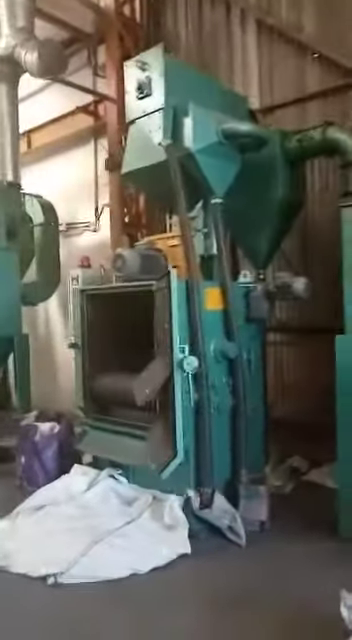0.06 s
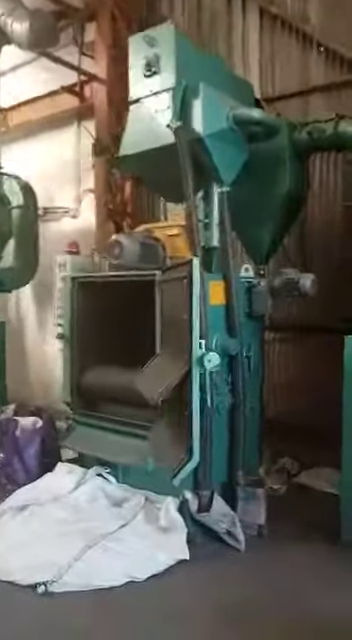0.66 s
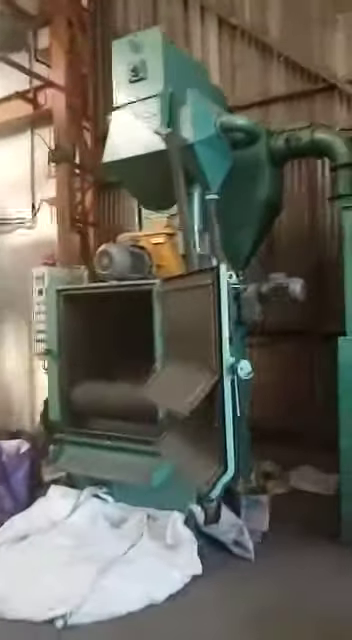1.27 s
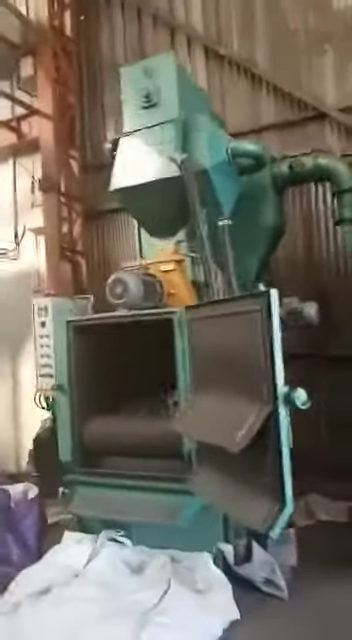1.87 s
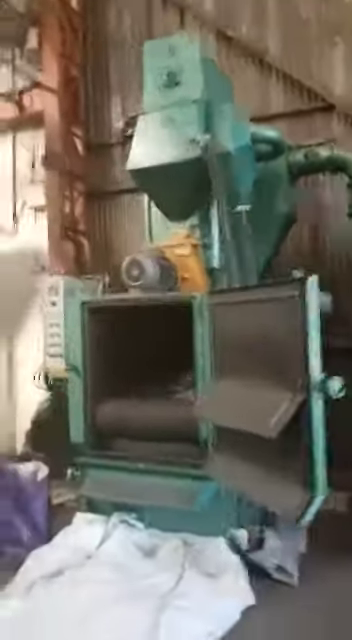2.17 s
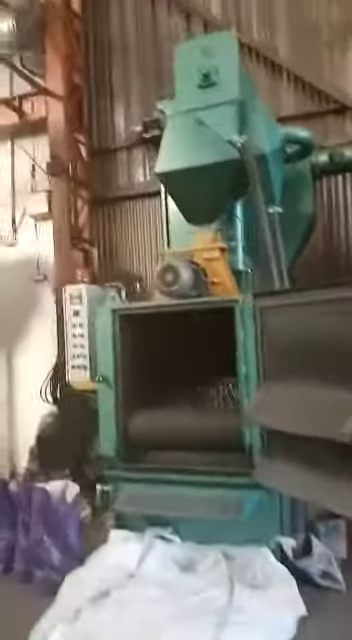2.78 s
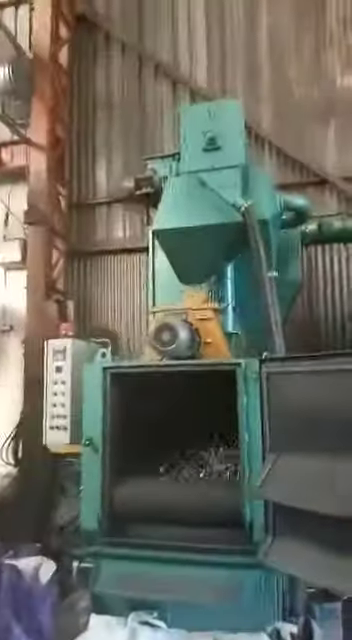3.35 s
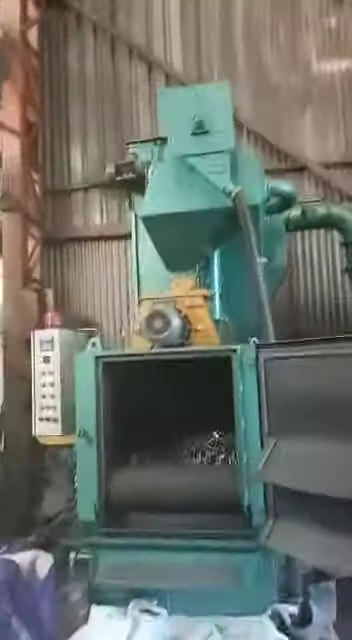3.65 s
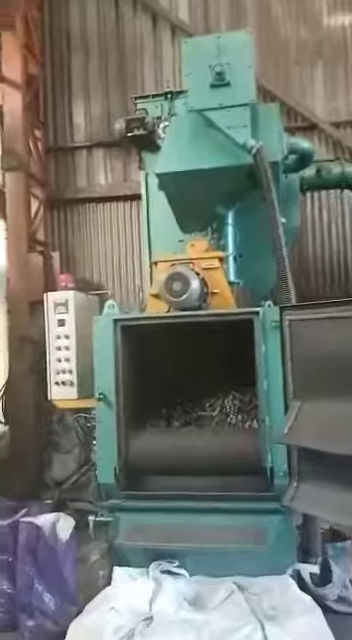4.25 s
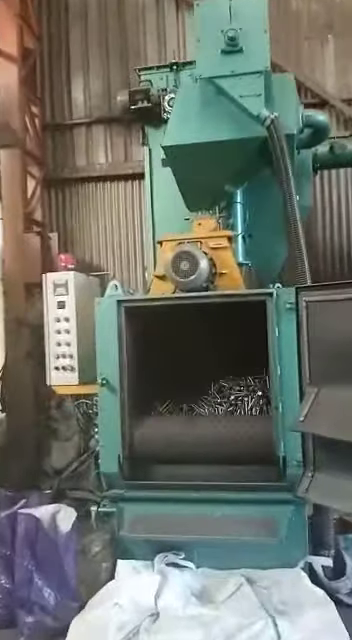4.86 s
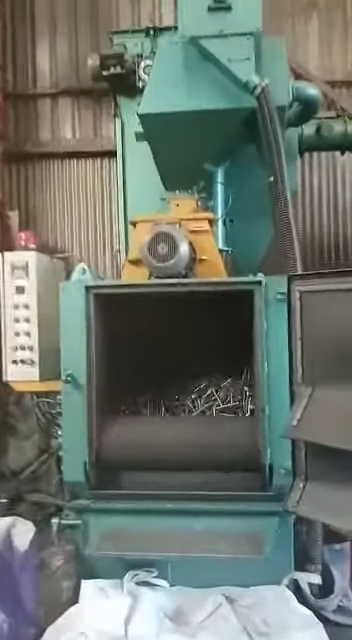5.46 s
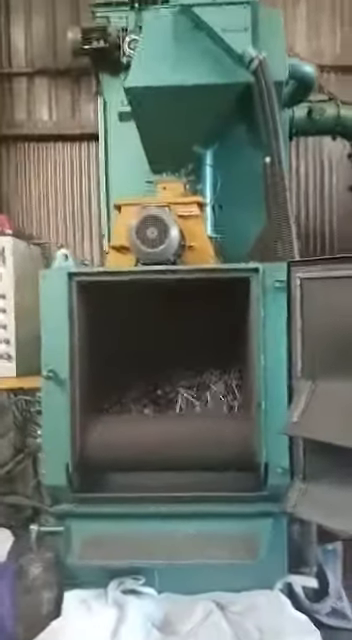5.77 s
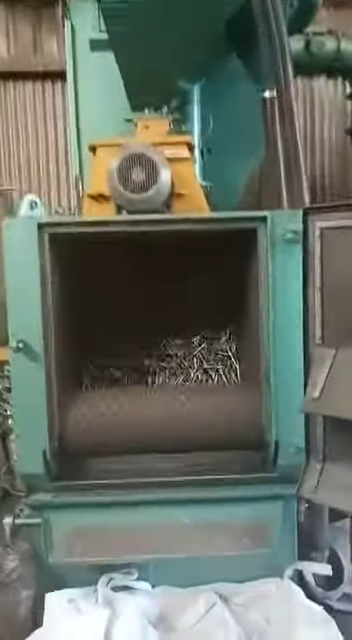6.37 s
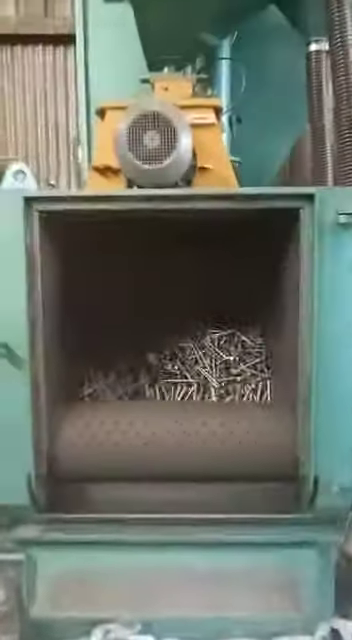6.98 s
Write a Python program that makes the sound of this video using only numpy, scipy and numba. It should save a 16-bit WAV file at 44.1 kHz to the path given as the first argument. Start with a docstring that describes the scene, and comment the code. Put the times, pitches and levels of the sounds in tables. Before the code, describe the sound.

A heap of steel pins tumbles on the rubber belt of an open blasting machine in a workshop. They clatter and jingle without pause, with single bright clinks standing out, over the steady low rumble of the drive and fan. Irregular knocks, brief scrapes and dull thumps come from the steel cabinet as the load slides. The sound grows a little louder as the microphone moves nearer.

```python
"""Steel pins tumble on the rubber belt of a blasting machine, its door open, in a sheet-metal workshop.
Each impact gives a broadband click and excites three bending modes, which the heap damps in buried pins.
Slides of the heap drive the panel modes of the steel cabinet and the air modes of the drum.
Belt drive and fan rumble underneath, while the listener moves slowly towards the opening."""
import sys
import numpy as np
from scipy import signal
from scipy.fft import rfft, irfft, next_fast_len
from scipy.io import wavfile
from scipy.ndimage import uniform_filter1d
from numba import njit

SR = 44100
rng = np.random.default_rng(int(sys.argv[2]) if len(sys.argv) > 2 else 0)


def to_wav(s):
    """Save 16-bit WAV."""
    ch = np.atleast_2d(s).T  # columns
    pcm = np.round(np.clip(ch, -1, 1) * 32767)  # PCM
    wavfile.write(sys.argv[1], SR, pcm.astype(np.int16))


N = 314433
TIME = np.arange(N) / SR
FFT_SIZE = 2 * next_fast_len(N // 2 + 8192)
FREQ = np.fft.rfftfreq(FFT_SIZE, 1 / SR)
SIDES = np.array([[1], [-1]])  # left, right; pan_db is left minus right
HALL_T60_S, PANEL_T60_S = 0.3, 0.15
BUILD_S = 0.0035  # a ring builds up among the reflections of the drum


def pins(clatter):
    """Impact excitation: a stream of collisions makes the pins click, rasp and ring."""
    start_s, size = blows(per_s=900, scatter_db=4.0)
    contacts = unit(bursts(start_s, size, t60=0.067, hall_db=-7.0))
    noise = clicks(contacts, clatter) + wedged_pins(contacts, clatter)
    return noise + buried_pins(start_s, size, clatter) + loose_pins()


# bending modes of a pin: pitch_hz, t60_s, spread_hz, gain_db, pan_db
PIN_MODES = [(2928, 0.27, 8.75, -0.5, -4.5), (7777, 0.16, 29.5, 4, 7), (14480, 0.082, 50.7, 2.5, -0.5)]
def bending(start_s, size, mode, damping_spread, phase_spread, tuning=1):
    """Flexural vibration of bars: length sets each pin's pitch, contact with its neighbours its decay."""
    hz, t60, spread_hz, db, pan_db = mode
    length, damping, place, spot = rng.standard_normal((len(start_s), 4)).T
    pitch_hz = hz * tuning + spread_hz * length
    ring_t60 = t60 * np.exp(damping_spread * np.clip(damping, -2, 1))
    swing = size * np.sign(spot)  # the side struck sets the sign of the first swing
    return rings(start_s, pitch_hz, ring_t60, swing, phase_spread * place) * undb(db + SIDES * pan_db / 2)


# envelope of the loose pins' first mode: time_s, level_db
FIRST_MODE_LEVELS = [(0.0, -38), (0.2, -28.5), (0.75, -35.5), (1.1, -28.5), (1.41, -26.5), (1.71, -28.5),
                     (2.41, -31.5), (2.91, -30.5), (3.1, -28.5), (4.12, -26.5), (4.8, -23.5), (4.92, -32.5),
                     (5.6, -33), (5.78, -28), (6.2, -29), (6.5, -37), (6.73, -40), (6.83, -28.5),
                     (7.13, -38)]
# envelopes of their overtones: time_s, second_mode_db, third_mode_db
OVERTONE_LEVELS = [(0.0, -30, -29.5), (0.8, -34, -33.5), (0.9, -29.5, -29), (1.51, -28, -26.5),
                   (1.91, -40, -32), (2.41, -30, -30.5), (2.81, -33, -30), (3.31, -32, -24),
                   (4.02, -34, -28.5), (4.72, -28.5, -23), (5.22, -34, -25), (5.72, -26, -23.5),
                   (6.53, -28.5, -25.5), (7.13, -24.5, -20)]
# offset added to each mode's envelope: gain_db
LOOSE_TRIM_DB = [-0.7, 0.13, -1.3]
def loose_pins():
    """Beating: lightly damped pins on top of the heap ring on together at slightly different pitches."""
    hits = blows(per_s=300, scatter_db=3.0)
    levels = curves(FIRST_MODE_LEVELS) + curves(OVERTONE_LEVELS)
    out = 0
    for mode, level_db, trim_db, phase in zip(PIN_MODES, levels, LOOSE_TRIM_DB, (1.1, 2.2, 2.2)):
        ring = bending(*hits, mode, damping_spread=0.37, phase_spread=phase)
        out += steady(hall(ring, wet_db=-5)) * undb(level_db + trim_db)
    return out


# ring of buried pins relative to the clatter, one per mode: gain_db
BURIED_GAIN_DB = [1.5, -8, -15]
def buried_pins(start_s, size, clatter):
    """Contact damping: the surrounding heap cuts the ring of a buried pin short."""
    out = 0
    for (hz, t60, *rest), gain_db, phase in zip(PIN_MODES, BURIED_GAIN_DB, (1.837, 3.674, 3.674)):
        ring = bending(start_s, size, (hz, 0.13 * t60, *rest), damping_spread=0.21, phase_spread=phase)
        out += unit(ring) * clatter * undb(gain_db)
    return out


# pins that fall clear: start_s, pitch_hz, first_mode_db, second_mode_db, third_mode_db
FALLING_PINS = [(0.12, 2906, -24, -42, -36), (0.49, 2919, -27, -36, -38), (0.95, 2924, -34, -44, -20),
                (1.069, 2923, -20, -42, -37), (1.32, 2926, -21.5, -40, -40), (1.408, 2923, -19, -38, -34),
                (1.526, 2931, -22.5, -49, -44), (2.11, 2924, -20.5, -46, -38),
                (2.506, 2935, -15.5, -40, -35), (2.935, 2920, -43, -26, -32),
                (3.009, 2924, -19.5, -42, -26), (3.054, 2927, -20.5, -41, -34),
                (3.605, 2923, -23, -46, -44), (4.34, 2912, -20.5, -43, -36), (4.41, 2925, -22.5, -40, -34),
                (4.63, 2929, -29, -28, -20), (4.795, 2930, -19, -41, -32), (4.846, 2920, -28, -44, -36),
                (5.098, 2921, -21, -35, -38), (5.201, 2920, -21, -42, -36), (5.275, 2925, -23, -43, -36),
                (5.497, 2936, -21, -32, -32), (6.155, 2920, -22.5, -29, -35),
                (6.245, 2937, -20.5, -24, -35), (6.375, 2926, -20.5, -40, -29),
                (6.525, 2938, -19.5, -40, -33), (6.614, 2934, -18, -30, -31), (6.728, 2920, -46, -23, -24),
                (6.805, 2921, -19, -26, -18), (6.918, 2912, -24, -28, -34), (6.985, 2935, -25, -37, -30)]
def falling_pins():
    """Free vibration: single pins land clear of the heap and ring longer, each at its own pitch."""
    start_s, pitch_hz, *mode_dbs = np.transpose(FALLING_PINS)
    tuning = pitch_hz / PIN_MODES[0][0]
    ring = 0
    for (hz, t60, _, db, pan_db), fall_db, phase in zip(PIN_MODES, mode_dbs, (.3, .9, .9)):
        mode = (hz, 1.33 * t60, 0, db, pan_db)
        ring += bending(start_s, undb(fall_db), mode, 0.071, phase, tuning)
    return hall(ring, wet_db=-8.5)


# spectrum of steel striking steel: frequency_hz, left_db, right_db
CLICK_SPECTRUM = [(396, 8.5, 6), (1430, 12, 12.5), (3560, 9, 11), (4430, 9, 13.5), (5400, 4.5, 10.5),
                  (6600, 3, 12.5), (7260, 3.5, 4), (8170, 20.5, 12), (9470, 14, 3), (10260, 9.5, 5.5),
                  (11270, -12, 4.5), (13200, -28, -28), (15700, 8, 5.5)]
def clicks(contacts, clatter):
    """Brief contact gives a broad spectrum; pins on top of the heap click most sharply."""
    sharp = unit(bursts(*blows(per_s=70, scatter_db=1.5), t60=0.0074, hall_db=-11.5))
    steel = unit(colour(contacts + undb(-11.5) * sharp, undb(spectrum(CLICK_SPECTRUM))))
    hardness_db = curves(OVERTONE_LEVELS)[0]  # hard contacts feed the overtones and also click louder
    return steel * clatter ** .68 * undb(0.33 * hardness_db + 6.0)


# modes of wedged pins: centre_hz, width_hz, gain_db, pan_db
WEDGED_MODES = [(2936, 296, -40.5, -2.5), (7820, 170, -46, -1), (14600, 610, -39, -9)]
def wedged_pins(contacts, clatter):
    """Damping broadens a resonance: pins wedged tight give their modes as a rasp."""
    envelope = unit(clatter ** .5)
    return sum(unit(colour(contacts, resonances([(hz, width, 0, pan_db)]))) * envelope * undb(db)
               for hz, width, db, pan_db in WEDGED_MODES)


# glancing blows in the doorway: start_s, level_db
GLANCING_BLOWS = [(0.484, -30), (2.06, -32), (2.602, -30), (3.945, -28), (4.367, -28), (6.508, -23.5),
                  (6.94, -22)]
def ticks():
    """Direct sound dominates near the opening: glancing pins tick brightly, with little reverberation."""
    start_s, db = np.transpose(GLANCING_BLOWS)
    return colour(bursts(start_s, undb(db), t60=0.11, hall_db=-16), unit(undb(spectrum(CLICK_SPECTRUM))))


# slides of the heap: middle_s, length_s, clatter_db, drumming_db, boom_db
HEAP_SLIDES = [(0.165, 0.13, -37, -36, -55), (0.298, 0.07, -38, -31, -55), (1.29, 0.82, -37.5, -37.5, -59),
               (1.81, 0.73, -39, -33, -47), (2.356, 0.38, -38.5, -34, -42), (3.017, 0.79, -39.5, -37, -38),
               (3.498, 0.78, -36.5, -28, -40.5), (4.247, 0.73, -41.5, -39, -56),
               (4.797, 0.44, -61, -51, -38), (5.055, 0.12, -37, -39, -40), (5.36, 0.75, -36, -27, -40),
               (6.364, 0.66, -39.5, -31.5, -46), (6.692, 0.2, -39.5, -28.5, -47),
               (7.12, 0.47, -36.5, -28, -55)]
def heap_envelopes():
    """Avalanching: the belt lifts the heap until part of it slides, in swells above a steady trickle."""
    middle_s, length_s, clatter_db, drumming_db, boom_db = np.transpose(HEAP_SLIDES)
    unrest = wander(per_s=18)
    clatter = surges(middle_s, length_s, clatter_db, rest_db=-40.5) * undb(0.5 * unrest - 0.03)
    drumming = surges(middle_s, length_s, drumming_db, rest_db=-34) * undb(0.78 * unrest)
    boom = surges(middle_s - 0.23, length_s, boom_db, rest_db=-39.5)  # the heap shifts before it slides
    return clatter * approach(db_per_halving=1.5), drumming * approach(db_per_halving=-0.57), boom


# panel modes of the cabinet: centre_hz, width_hz, gain_db, pan_db
PANEL_MODES = [(631, 57, -6.5, 4.5), (704, 140, -13.5, 0), (902, 44, 0, -1.5), (962, 83, -0.5, -4.5),
               (1110, 53, 2.5, -0.5), (1184, 116, -4.5, -6), (1397, 63, 0, 0.5), (1629, 46, -5, -5.5),
               (1750, 61, -2.5, -6), (1816, 51, -1.5, -4.5), (1946, 86, -6, 0), (2150, 115, -4.5, -3.5)]
def cabinet(drumming):
    """Plate resonance: the steel panels filter the patter of the sliding heap."""
    patter = unit(bursts(*blows(per_s=170, scatter_db=3.0), t60=0.013, hall_db=-5.5)) * drumming
    return colour(patter, unit(resonances(PANEL_MODES)))


# pins that hit the wall: start_s, blow_db, crack_relative_db, ring_hz, ring_db
WALL_KNOCKS = [(0.064, -30, -17, 1760, -31), (0.285, -22.5, -23, 1120, -34),
               (0.406, -26.5, -9.5, 1393, -36), (0.955, -26, -24, 1813, -28), (1.278, -26, -20, 1406, -27),
               (1.335, -22.5, -18, 1150, -26), (1.576, -21.5, -14, 1730, -32), (1.738, -25, -9, 1415, -34),
               (2.041, -22, -20, 1123, -28), (3.235, -29, -8, 967, -23.5), (3.952, -26.5, -16, 1790, -35),
               (4.06, -27, -21, 1380, -35), (4.214, -31, -6, 1114, -25.5), (4.378, -25, -12, 1394, -31),
               (4.806, -24, -12, 1790, -31), (4.993, -17, -22, 923, -27), (5.531, -23, -12, 1830, -32),
               (5.761, -26.5, -12, 932, -28), (6.252, -26, -7, 1786, -28), (6.355, -22.5, -14, 1112, -22.5),
               (6.668, -31, -7, 900, -30)]
def knocks():
    """A hard hammer favours high modes: a bare pin cracks on a panel, and one mode rings on."""
    start_s, blow_db, crack_db, ring_hz, ring_db = np.transpose(WALL_KNOCKS)
    blow = bursts(start_s, undb(blow_db + 2.0), t60=0.075, hall_db=-24)
    hardness = undb(spectrum([(900, -5.5), (1900, -0.5), (3000, 10)]))
    knock = colour(blow, hardness * unit(resonances(PANEL_MODES)))
    crack = bursts(start_s, undb(blow_db + crack_db), t60=0.21, hall_db=-14)
    brightness = undb(spectrum(CLICK_SPECTRUM) + spectrum([(2500, 1), (9000, -0.5)]))
    phase = 0.82 * rng.standard_normal(len(start_s))
    clinks = rings(start_s, ring_hz, np.full(len(start_s), PANEL_T60_S), undb(ring_db), phase)
    return knock + colour(crack, brightness) + hall(clinks, wet_db=-7)


# the load judders along the wall: middle_s, length_s, pitch_hz, level_db
WALL_SCRAPES = [(1.21, 0.4, 280, -42), (2.315, 0.125, 1134, -32.5), (3.53, 0.42, 1103, -40),
                (4.8, 0.18, 298, -38), (5.29, 0.25, 955, -37), (5.48, 0.4, 1110, -39.5),
                (6.62, 0.2, 1070, -39), (6.65, 0.57, 633, -46.5), (6.73, 0.36, 915, -42.5)]
def scrapes(slips=32):
    """Stick-slip friction: every slip kicks one panel mode afresh, so the tone comes out rough."""
    middle_s, length_s, hz, db = np.repeat(WALL_SCRAPES, slips, axis=0).T
    late, force, detune, place = rng.standard_normal((len(hz), 4)).T
    along = (np.arange(len(hz)) % slips + .5 * late) / slips - .5
    start_s = middle_s + along * length_s
    size = undb(db + 2.0) * np.sign(force) * np.sqrt(length_s / PANEL_T60_S)
    ring = rings(start_s, hz * (1 + .004 * detune), np.full(len(hz), PANEL_T60_S), size, .5 * place)
    return hall(ring, wet_db=-9.5)


# air modes of the drum: centre_hz, width_hz, gain_db, pan_db
AIR_MODES = [(275.4, 45, 0.5, -0.5), (297.4, 19, -0.5, 1), (354, 40, -2, -2.5), (470, 100, -5.5, 0.5)]
# heavy lumps landing on the belt: start_s, level_db
BELT_THUDS = [(0.241, -34), (1.05, -33), (1.31, -31.5), (2.76, -33), (2.868, -32.5), (2.979, -33),
              (3.19, -29.5), (4.131, -34), (5.18, -29), (5.671, -33), (6.24, -33), (6.68, -31)]
def drum(boom):
    """Cavity resonance: the load thuds on the rubber and excites the air in the drum."""
    patter = unit(bursts(*blows(per_s=120, scatter_db=2.0), t60=0.014, hall_db=-6.0)) * boom
    start_s, db = np.transpose(BELT_THUDS)
    thuds = bursts(start_s, undb(db), t60=0.23, hall_db=-11)
    return colour(patter + thuds, unit(resonances(AIR_MODES)))


# the load slumps on the belt: time_s, length_s, thump_db, rumble_db
BELT_SLUMPS = [(1.793, 0.5, -32, -38.5), (2.35, 0.25, -42, -41), (2.905, .15, -37, -53),
               (3.35, 0.34, -44, -42), (3.93, .2, -40, -48), (4.59, 0.34, -32, -43),
               (5.282, 0.33, -50, -42), (5.687, 0.4, -43, -42.5), (6.356, 0.18, -40, -41),
               (6.82, 0.5, -34, -43), (7.03, .2, -38, -45)]
def slumps():
    """Damped oscillation: the whole heap drops on the slack belt with a dull thump."""
    start_s, _, db, _ = np.transpose(BELT_SLUMPS)
    each = np.ones(len(start_s))
    return rings(start_s, hz=74 * each, t60=0.33 * each, size=undb(db), phase=0 * each, build_s=0.022)


# rumble spectrum of belt and fan: frequency_hz, gain_db
RUMBLE_SPECTRUM = [(20, -28), (50, -31), (70, -28), (85, -9), (110, -3.5), (140, -0.5), (175, 1.5),
                   (215, 0.5), (300, -12), (700, -26.5)]
# motor and fan tones: pitch_hz, level_db
HUM_TONES = [(139, -52), (392, -48)]
def drive():
    """Rotating machinery gives tones over broadband noise; the noise swells as the belt takes a slump."""
    middle_s, length_s, _, rumble_db = np.transpose(BELT_SLUMPS)
    effort = surges(middle_s, length_s, rumble_db, rest_db=-42) * approach(db_per_halving=3.5)
    rumble = unit(colour(diffuse(), undb(spectrum(RUMBLE_SPECTRUM)))) * effort * undb(SIDES * 0.38)
    return rumble + sum(tone(hz, waver_hz=2.77, flutter_db=5.5) * undb(db) for hz, db in HUM_TONES)


# the belt labours: middle_s, length_s, pitch_hz, level_db
DRIVE_DRONES = [(5.26, .12, 175, -34.5), (5.428, 0.19, 166, -37.5), (5.97, 0.1, 170.7, -39),
                (6.642, .16, 174.6, -36), (7.04, 0.24, 190, -37.5)]
def drones():
    """Forced vibration: a low, unsteady hum swells from the drive under load."""
    return sum(tone(hz, waver_hz=5.0, flutter_db=6.5) * swell(middle_s, length_s) * undb(db)
               for middle_s, length_s, hz, db in DRIVE_DRONES)


# likeness of left and right in the workshop: frequency_hz, correlation
FIELD_CORRELATION = [(50, 0.41), (130, 0.95), (290, 0.93), (640, 0.44), (950, 0.49), (1150, -0.063),
                     (1400, -0.32), (1850, 0.29), (2930, 0.25), (15000, -0.24)]
def diffuse():
    """Diffuse field: white noise at two points, with a correlation that depends on frequency."""
    alike = np.clip(spectrum(FIELD_CORRELATION), -1, 1)
    mid, side = colour(rng.standard_normal((2, N)), np.sqrt((1 + SIDES * alike) / 2))
    return mid + SIDES * side


def hall(x, wet_db):
    """Reverberation: convolution with decaying noise adds the workshop's reflections."""
    decay = fade(HALL_T60_S)
    tail = diffuse()[:, :len(decay)] * decay
    tail /= np.sqrt(np.sum(tail ** 2) / 2)
    return x + undb(wet_db) * signal.fftconvolve(x, tail, axes=1)[:, :N]


def approach(db_per_halving):
    """Distance law: a layer's gain as the listener walks from 4.7 m to 1.9 m."""
    distance_m = np.interp(TIME, [1.0, TIME[-1]], [4.7, 1.9])
    return undb(db_per_halving * np.log2(distance_m[0] / distance_m))


def blows(per_s, scatter_db):
    """Random collisions, as times and sizes: exponentially distributed levels, many soft, a few hard."""
    count = int(per_s * TIME[-1])
    jitter, chance = rng.random((count, 2)).T
    start_s = (np.arange(count) + 4 * jitter) / per_s % TIME[-1]
    return start_s, undb(scatter_db * np.minimum(-np.log(chance), 4))


def bursts(start_s, size, t60, hall_db):
    """Incoherent sources add in power: each blow is a noise burst with a weak reverberant tail."""
    energy = np.bincount((np.clip(start_s, 0, TIME[-1]) * SR).astype(int), size ** 2, N)
    direct = signal.fftconvolve(energy, fade(t60) ** 2)[:N]
    tail = undb(hall_db) ** 2 * signal.fftconvolve(energy, fade(HALL_T60_S) ** 2)[:N]
    return np.sqrt(np.abs(direct + tail)) * diffuse()


@njit
def rings(start_s, hz, t60, size, phase, build_s=BUILD_S):
    """Damped oscillators: a decaying sine for each blow, the left side leading by a phase in radians."""
    out = np.zeros((2, N))
    for k in range(len(start_s)):
        start = max(int(start_s[k] * SR), 0)
        pole = np.exp((2j * np.pi * hz[k] - 6.91 / t60[k]) / SR)
        phasor, lead = size[k] + 0j, np.exp(1j * phase[k])
        for i in range(start, min(N, start + int(.8 * t60[k] * SR))):
            phasor *= pole
            rise = min((i - start) / (build_s * SR), 1.)
            out[0, i] += rise * (phasor * lead).imag
            out[1, i] += rise * phasor.imag
    return out


def resonances(modes):
    """Left and right gain of overlapping resonances, summed in power."""
    return np.sqrt(sum(undb(db + SIDES * pan_db / 2) ** 2 / (1 + 2 * ((FREQ - hz) / width) ** 2) ** 2
                       for hz, width, db, pan_db in modes))


def tone(hz, waver_hz, flutter_db):
    """A sine under random frequency and amplitude modulation."""
    phase = 2 * np.pi * np.cumsum(hz + waver_hz * wander(40)) / SR
    return unit(np.sin(phase) * undb(flutter_db * wander(30)))


def surges(middle_s, length_s, db, rest_db):
    """Swells on a resting level, summed in power."""
    power = sum((undb(level) * swell(at, span)) ** 2 for at, span, level in zip(middle_s, length_s, db))
    return np.sqrt(undb(rest_db) ** 2 + power)


def swell(middle_s, length_s):
    """A Gaussian rise and fall."""
    return np.exp(-(2 * (TIME - middle_s) / length_s) ** 2)


def fade(t60):
    """Exponential decay by 60 dB in t60 seconds."""
    return np.exp(-np.log(1000) * TIME[:int(t60 * SR) + 2] / t60)


def wander(per_s):
    """A random control with a new value per_s times a second."""
    steps = np.arange(int(per_s * TIME[-1]) + 2) / per_s
    return np.interp(TIME, steps, rng.standard_normal(len(steps)))


def curves(table):
    """Each column of a control table at every sample."""
    time_s, *columns = np.transpose(table)
    return [np.interp(TIME, time_s, column) for column in columns]


def spectrum(points):
    """Each column of a frequency table, joined on a logarithmic axis."""
    hz, *columns = np.transpose(points)
    return np.array([np.interp(np.log(FREQ + 1), np.log(hz), column) for column in columns])


def colour(x, gain):
    """Filter by a gain at each frequency."""
    return irfft(rfft(x, FFT_SIZE) * gain, FFT_SIZE)[..., :N]


def steady(x):
    """Hold the rms at 1 over a tenth of a second; the quick beating stays."""
    return x / np.sqrt(uniform_filter1d(np.mean(x ** 2, axis=0), SR // 10) + 1e-12)


def unit(x):
    """Scale to rms 1."""
    return x / np.sqrt(np.mean(x ** 2))


def undb(db):
    """Decibels to gain."""
    return 10 ** (np.asarray(db) / 20)


def scene():
    """Superposition of the tumbling pins, the cabinet and drum round them, and the drive."""
    clatter, drumming, boom = heap_envelopes()
    load = pins(clatter) + falling_pins() + ticks()
    housing = cabinet(drumming) + knocks() + scrapes() + drum(boom)
    return load + housing + slumps() + drive() + drones()


def record(dry):
    """Frequency response: the deep bass and a band near 14 kHz are weak, and the top is cut."""
    response_db = spectrum([(30, -13), (52, 0.5), (11000, 2.0), (12200, -1.0),
                            (13200, -4), (13900, -16), (14400, 5.5)])
    lowpass = signal.ellip(10, .2, 80, 15680, fs=SR, output="sos")
    return signal.sosfilt(lowpass, colour(dry, undb(response_db)))


dry = scene()
out = record(dry)
to_wav(out)
```